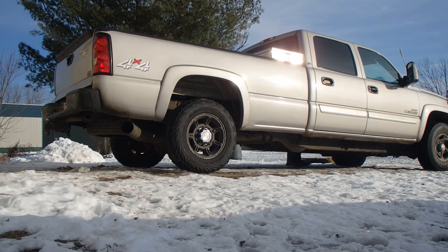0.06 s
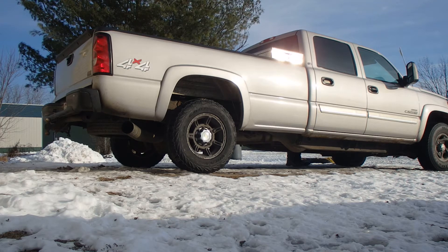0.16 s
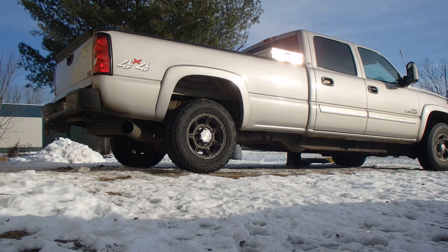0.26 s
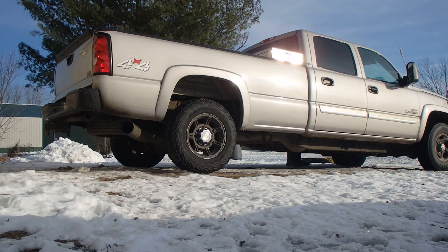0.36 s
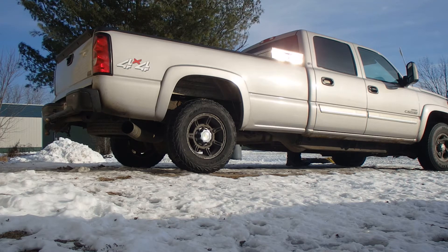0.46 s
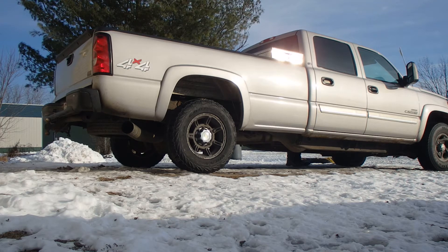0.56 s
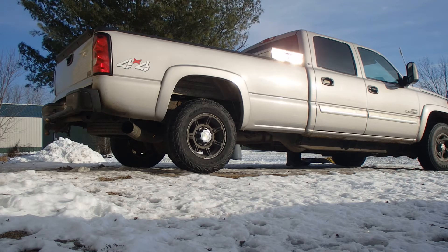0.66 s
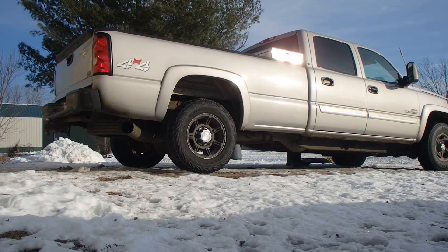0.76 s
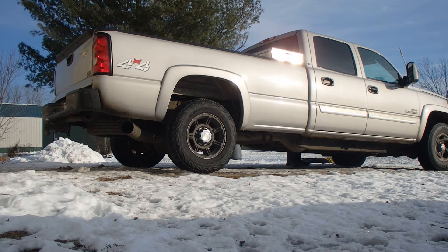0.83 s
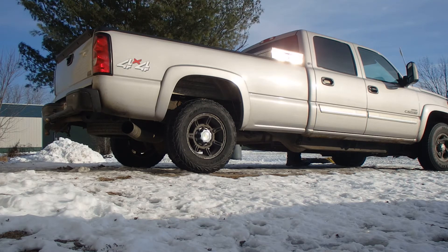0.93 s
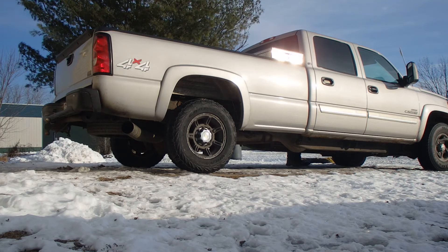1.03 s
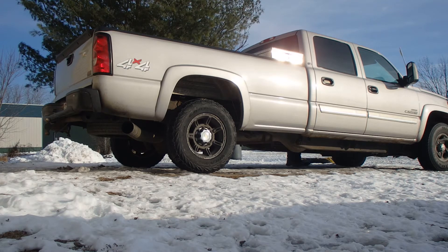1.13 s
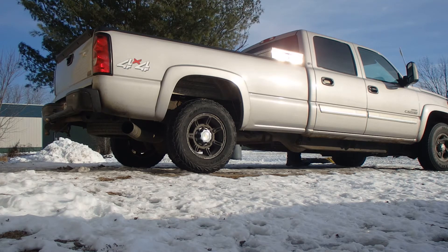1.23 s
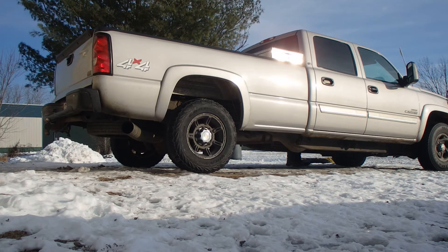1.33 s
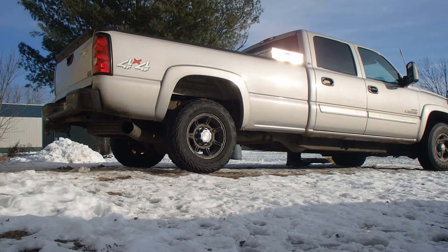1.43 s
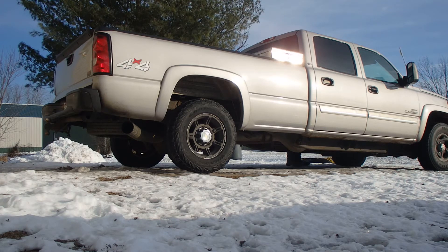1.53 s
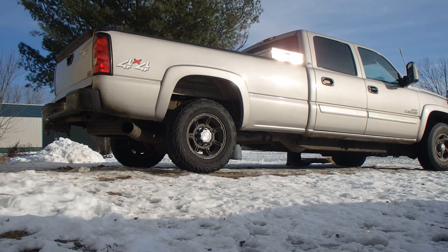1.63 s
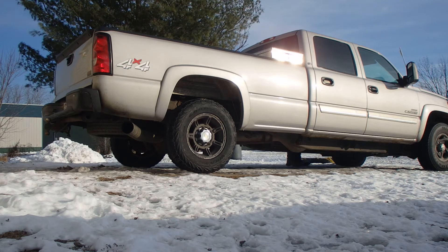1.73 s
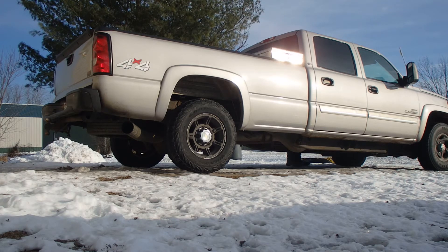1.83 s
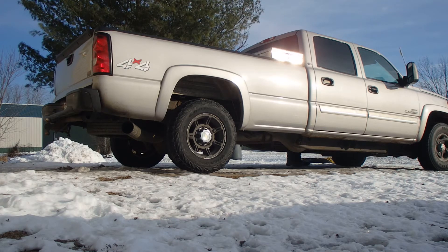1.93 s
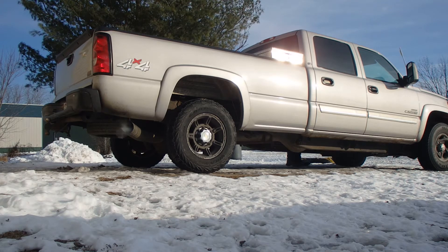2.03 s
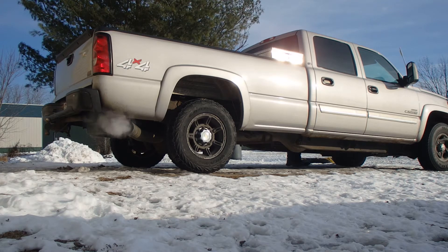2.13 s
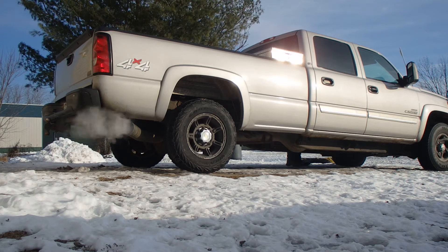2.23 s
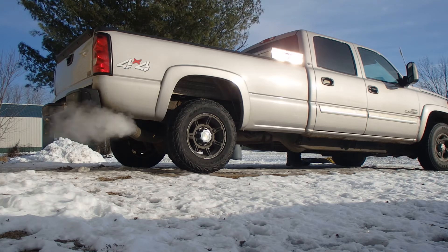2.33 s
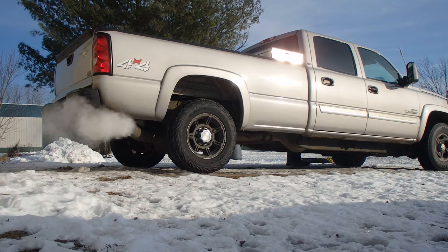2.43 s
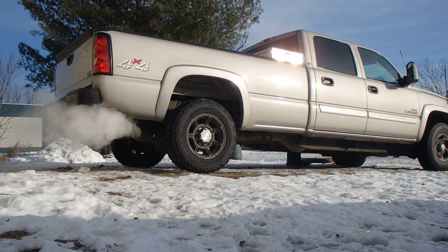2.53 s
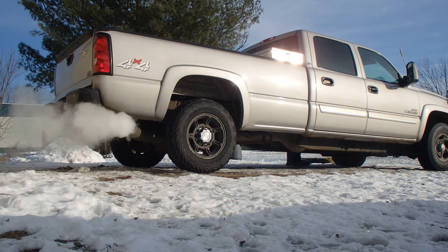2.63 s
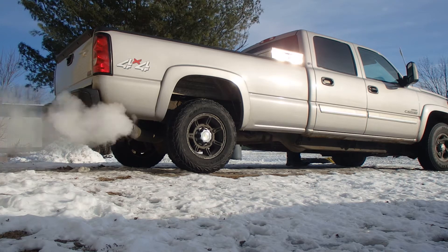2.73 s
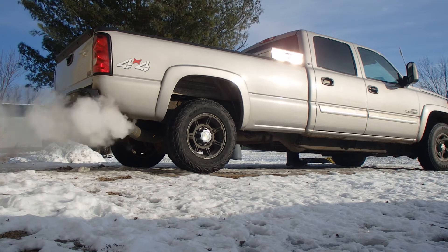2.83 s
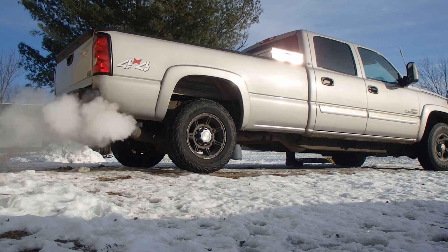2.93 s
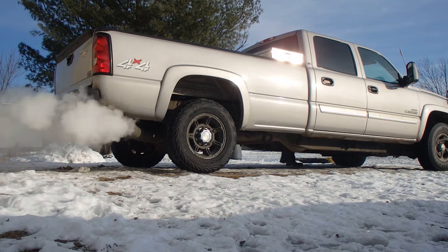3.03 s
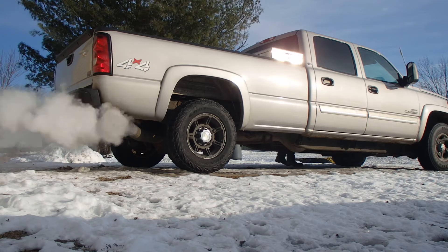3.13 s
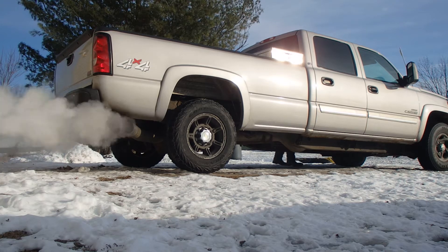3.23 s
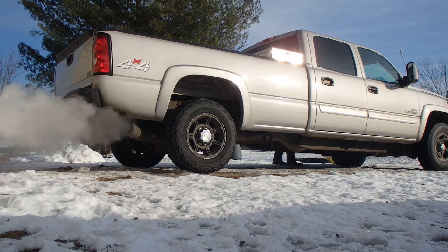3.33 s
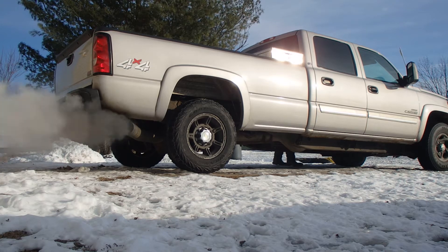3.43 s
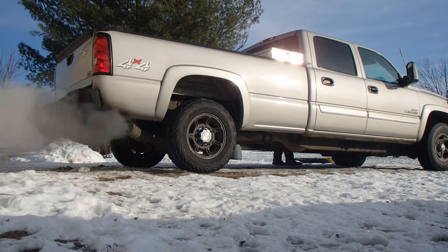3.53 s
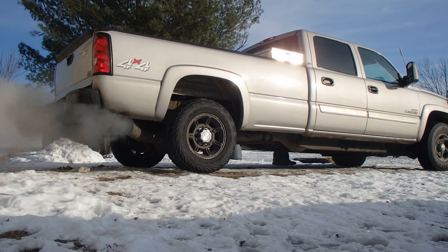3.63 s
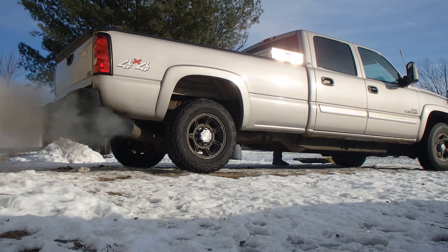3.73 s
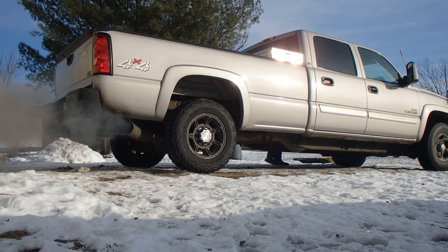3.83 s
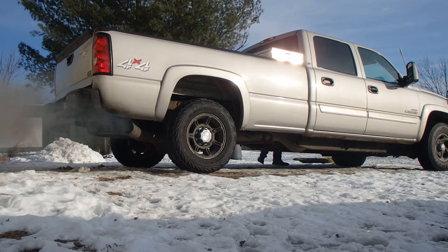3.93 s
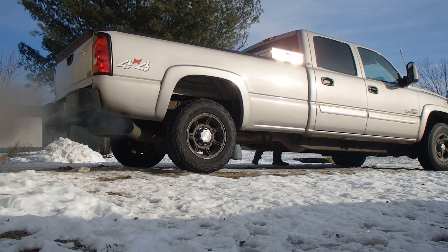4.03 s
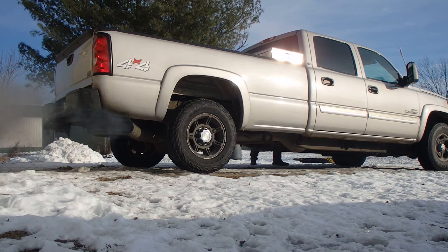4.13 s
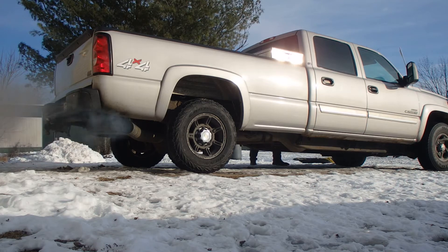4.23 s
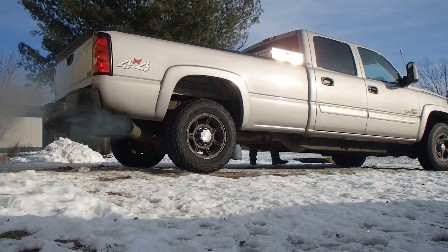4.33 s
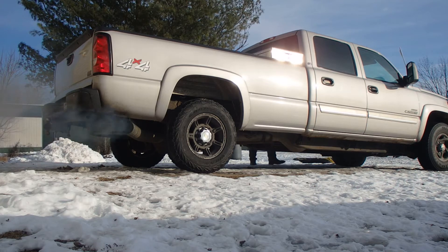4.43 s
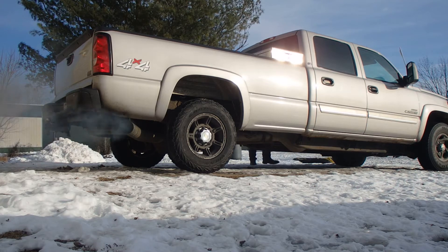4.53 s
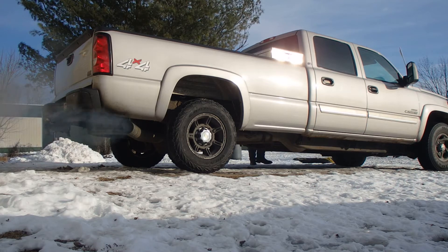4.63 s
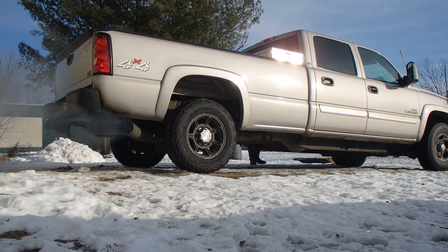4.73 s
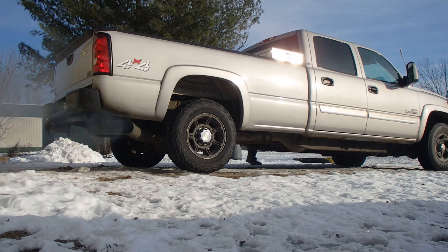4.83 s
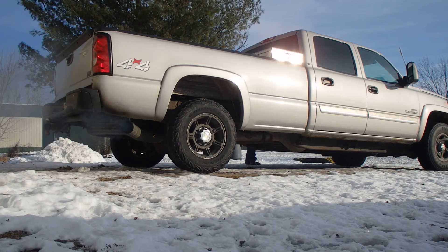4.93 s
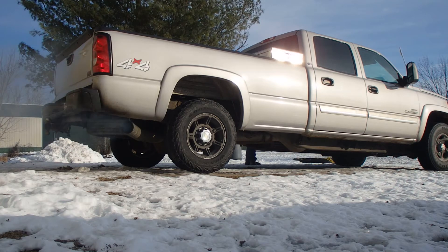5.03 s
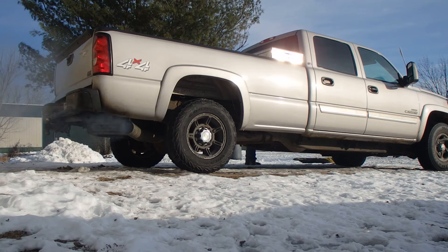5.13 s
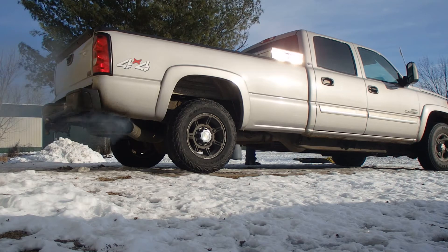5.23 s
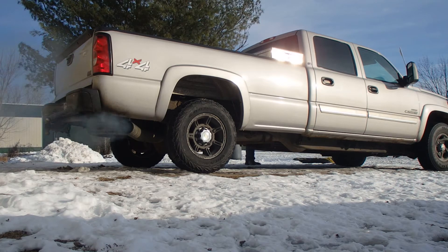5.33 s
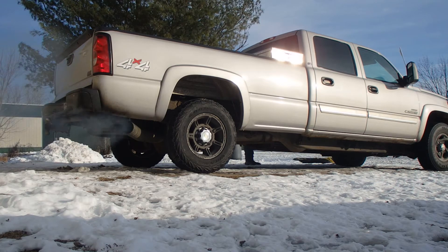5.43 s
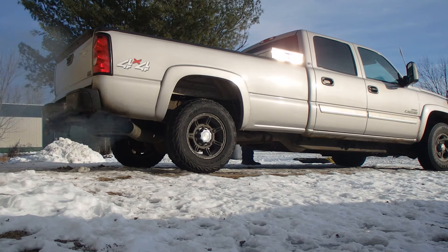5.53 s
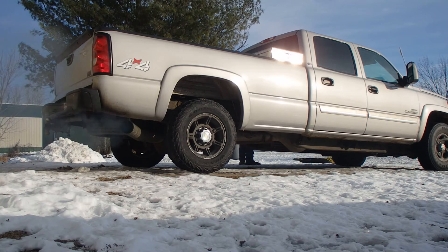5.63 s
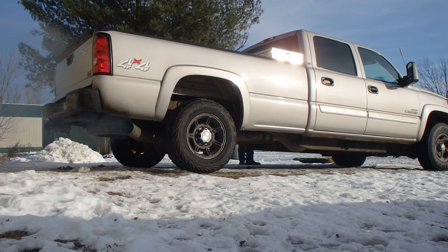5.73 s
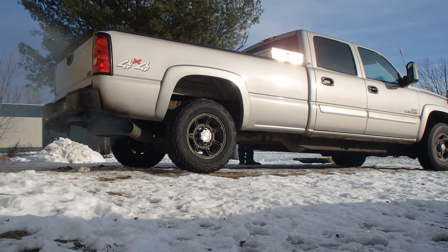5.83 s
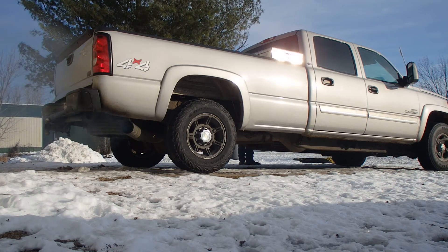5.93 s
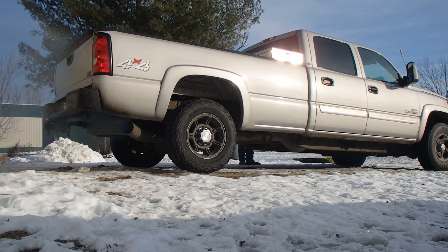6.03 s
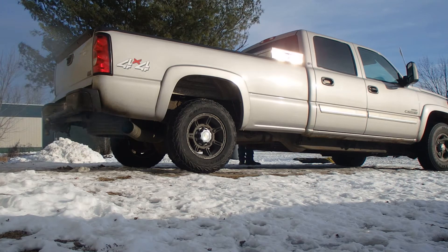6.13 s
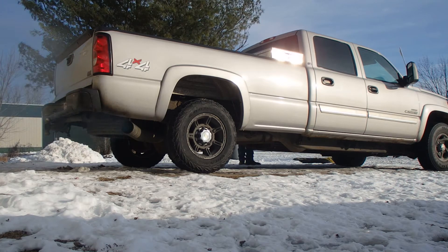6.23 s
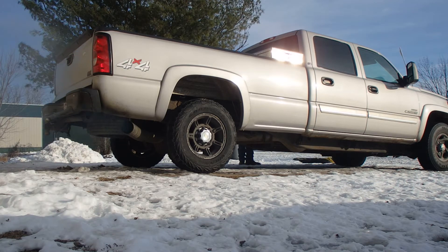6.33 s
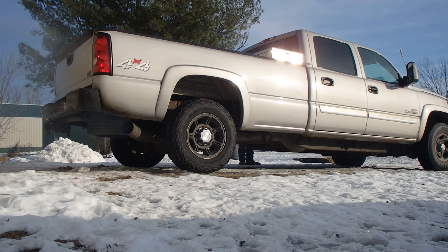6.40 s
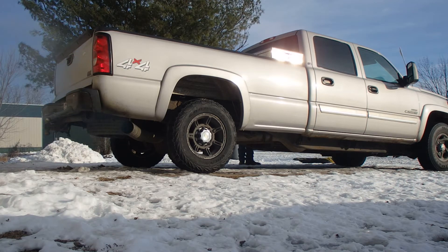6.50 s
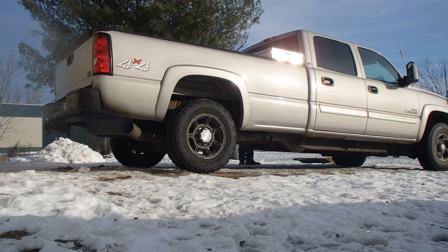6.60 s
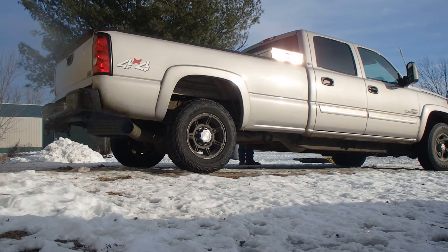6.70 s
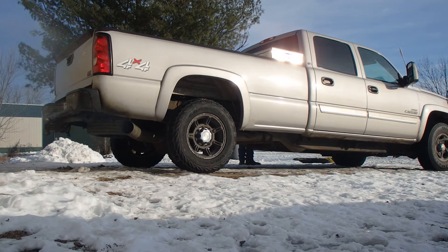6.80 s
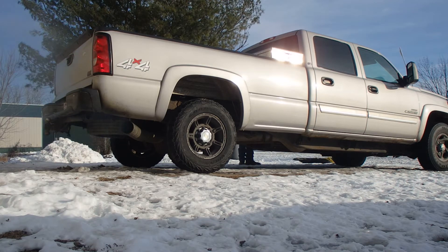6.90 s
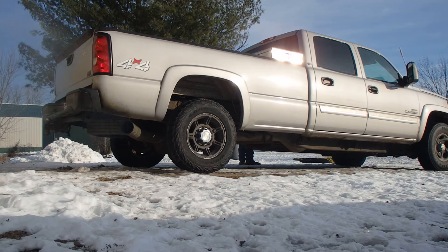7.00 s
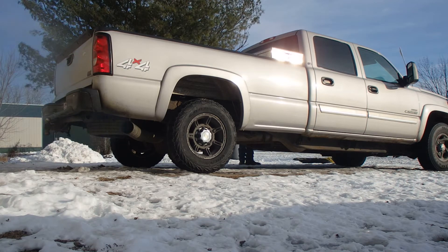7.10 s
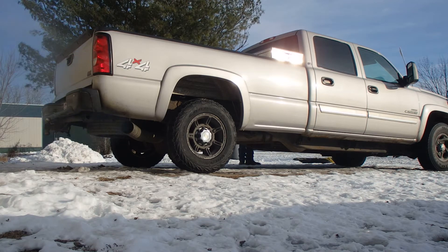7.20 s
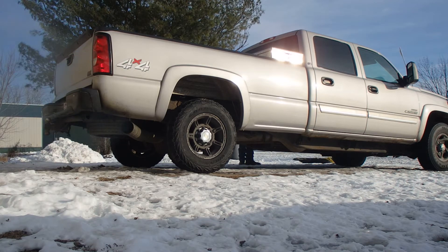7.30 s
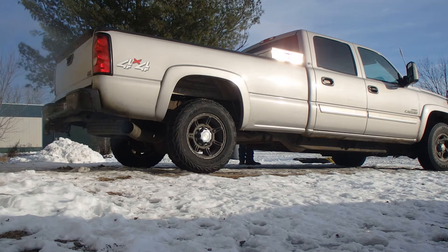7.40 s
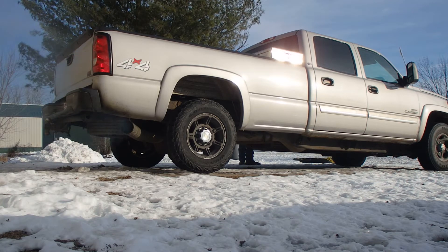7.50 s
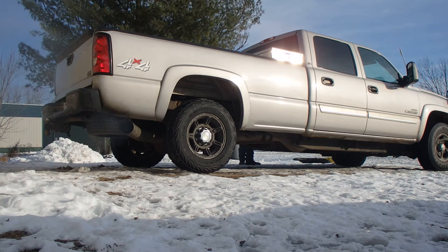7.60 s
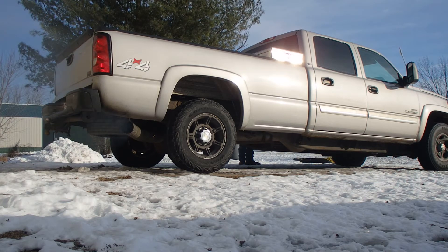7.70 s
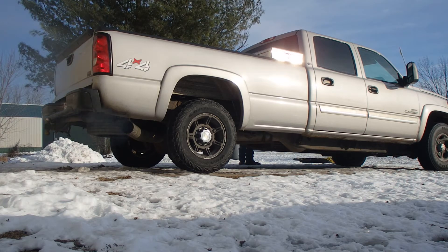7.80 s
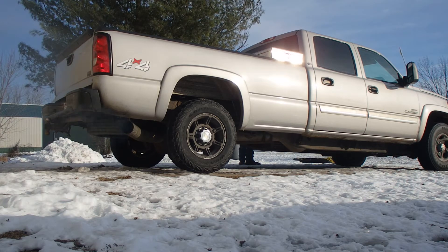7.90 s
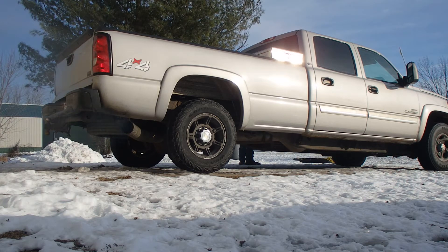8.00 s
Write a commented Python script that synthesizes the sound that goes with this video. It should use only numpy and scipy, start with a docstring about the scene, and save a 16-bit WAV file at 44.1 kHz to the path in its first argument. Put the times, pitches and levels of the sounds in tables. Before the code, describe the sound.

Quiet outdoor yard with faint rumble, hiss and hum. After half a second a starter engages with a metallic clank, then grinds and whines in slow surges for just over a second. A large diesel catches with a deep burst, stumbles, and settles to a rough, rattling idle. Low exhaust pulses are close to the microphones, which sit near the ground behind the tailpipe; sharp knocks come from under the truck.

```python
"""A snowy yard, on the ground behind a truck's tailpipe: a cold eight-cylinder diesel is started.
The starter engages and labours over nine compressions: grinding gears, a sagging whine, a shaking body.
The engine catches, hunts and settles to an idle: pulses of gas ring the exhaust pipe, and each
firing knocks in the block as a short burst of coloured noise. Faint rumble, hiss and hum lie behind."""
import sys
import numpy as np
from scipy import signal
from scipy.fft import rfft, irfft, next_fast_len
from scipy.io import wavfile
from scipy.ndimage import map_coordinates

SR = 44100
rng = np.random.default_rng(int(sys.argv[2]) if len(sys.argv) > 2 else 0)


def amplitude_ratio(level_db):
    """Convert a level in decibels to the matching linear amplitude (field) ratio."""
    exponent = np.asarray(level_db, float) / 20
    return 10 ** exponent


def persist_wave(psi):
    """Save psi, clipped to +-1, as 16-bit WAV."""
    counts = np.round(np.clip(psi, -1, 1) * 32767).astype(np.int16)
    wavfile.write(sys.argv[1], SR, np.atleast_2d(counts).T)


N = 355446  # length in samples

# Crankshaft speed before the governor's kicks: t/s, speed/rpm
CRANK_SPEED = [(1.8, 585.0), (1.9, 453.2), (1.97, 630.4), (2.08, 801.7), (2.2, 661.1), (2.33, 857.3),
               (2.47, 756.8), (2.66, 793.8), (2.77, 748.0), (2.88, 774.7), (3.0, 771.3), (4.2, 776.6),
               (5.1, 764.0), (5.6, 716.5), (8.06, 712.0)]
# Cylinders in firing order: strength/dB, delay from firing to tailpipe/ms,
# share repeated by the longer branch of the pipe, knock/dB
CYLINDERS = [(3.0, 15.7, 0.79, -2.5), (0.1, 16.7, 0.02, 1.1), (1.4, 15.3, 0.78, 0.3),
             (-1.0, 17.4, 0.12, 0.6), (-0.1, 15.2, 0.69, 0.2), (0.5, 15.5, 0.26, 0.1),
             (1.7, 15.2, 0.92, 0.4), (-5.6, 19.3, 0.14, -1.2)]
# Resonances of the exhaust pipe, before its low and high ends are cut: f/Hz, width/Hz, level/dB
PIPE_MODES = [(47.0, 60.0, -18.0), (110.0, 22.0, -11.0), (157.0, 22.0, -15.0), (204.0, 22.0, -23.0),
              (249.0, 25.0, -33.0), (310.0, 25.0, -32.0), (396.0, 25.0, -29.0)]
# Engine catching and warming: t/s, exhaust level/dB, knock level/dB, brightness/dB, hollow low knock/dB
WARM_UP = [(1.8, -25, -35, 7, -11), (1.84, -20.5, -23.5, 6.5, -12), (1.9, -6.5, -14.5, -5.5, 7.5),
           (2.08, -9.5, -24.5, -4.5, 7.5), (2.3, -9, -23, -4.5, 7.5), (2.6, -9, -21.5, -8, 6),
           (3.1, -7, -17.5, -1.1, 3), (3.9, -7, -15.5, -0.2, -0.2), (4.6, -9.5, -14.5, -2.8, -3),
           (5.7, -12.5, -15, -3.5, -4.5), (6.7, -11.5, -14.5, -2.5, -3), (8.06, -11, -14, -2.5, -3.5)]
# Colour of the gas rushing out of the tailpipe: f/Hz, level per Hz/dB
GAS_COLOUR = [(35, -47), (70, -17), (110, -2.5), (190, -4.5), (250, -15.5), (340, -9.5), (420, -12.5),
              (520, -24.5), (670, -23), (880, -41), (1100, -68.5)]
# Colour shared by the knock and the starter's grind: f/Hz, level per Hz/dB
SHARED_COLOUR = [(450, -41), (670, -30), (900, -21.5), (1150, -15), (1600, -11), (2000, -4.5), (2300, -7.5),
                 (2600, -1.5), (3000, -15), (3300, -6.5), (3750, -3.5), (4000, -17), (4700, -26.5),
                 (5150, -16.5), (5500, -18), (6800, -26), (9800, -24.5), (11500, -35), (13000, -43),
                 (15700, -66)]
# Castings and panels that ring on: f/Hz, width/Hz, level/dB
PANEL_MODES = [(673.6, 17.6, 15), (1137, 12, 8), (1290, 6.2, 2), (1488, 11.2, 12), (1587, 28, -1),
               (1666, 43, 4), (1680, 8.5, -1.5), (1934, 14.4, 6.5), (2514, 54.4, -16), (2620, 62, -10),
               (2785, 86, 7), (3358, 61, 6.5), (3577, 59, -0.5), (3746, 46, 4.5), (5134, 26, 4.5)]
# Compressions dragging the starter down: t/s of the slowest turn, slowest gear mesh f/Hz,
# whine level before its swing/dB, extra level of the high multiples/dB
COMPRESSIONS = [(0.66, 339.3, -24, -14), (.82, 300, -29, -19), (1.002, 300, -32.5, -4),
                (1.166, 301.8, -29, -1.5), (1.31, 306, -27, -1.5), (1.457, 300, -31.5, 1),
                (1.6, 304.5, -26.5, -1.5), (1.746, 297, -27.5, 1), (1.862, 401, -56, 3)]
# Tones of the starter whine: multiple of the mesh frequency, relative level/dB
WHINE_TONES = [(1, 2), (2.3, -4.5), (3, -6.5), (5, 2.5), (7.501, 2)]
# Colour of the starter's grind against the shared colour: f/Hz, level/dB
GRIND_COLOUR = [(250, 39), (500, 44), (700, 19), (900, 19.5), (1150, 25), (1500, 17), (2000, 10),
                (2800, 10), (3600, 12.5), (4600, 15.5), (8000, 12), (15000, -2)]
# Colour of the shaking body: f/Hz, level per Hz/dB
SHAKE_COLOUR = [(26, -28), (45, 1.5), (134, -2.5), (172, -17), (186, -8.5), (260, -2.5), (340, -16),
                (570, -120)]
# Metal blows as the pinion meets the flywheel, before attack and colour: t/s, level/dB, thud level/dB
PINION_BLOWS = [(0.563, -22, -31), (0.571, -5.5, -31), (.584, -3, -8), (0.606, -10, -2), (0.626, -17, -3),
                (0.819, -22, -2), (0.964, -8.5, -28), (1.002, -17, -6), (1.022, -19, -7), (1.041, -22, -4)]
# A faint whirr that begins ahead of the starter: t/s, level/dB
EARLY_WHIRR = [(.34, -77), (.37, -54), (.55, -54), (.6, -75)]
# Colour of the yard's background: f/Hz, level per Hz/dB
YARD_COLOUR = [(32, -29), (55, -3.5), (145, 0.5), (402, -16.5), (677, -21), (762, -16), (818, -25.5),
               (1440, -25), (1830, -28), (8140, -30.5), (12200, -29.5), (14400, -28), (15800, -34)]
# How alike the yard sounds left and right: f/Hz, likeness (1 = the same, 0 = unrelated)
YARD_LIKENESS = [(60, 0.82), (180, 1), (550, 0.82), (1650, 0.4), (4970, 0.37), (15000, -0.78)]
# Faint hum, against the background and before its wavering: f/Hz, level/dB
HUM_TONES = [(250, -11), (750, -18)]
# Background level, sinking once the engine fires: t/s, level/dB
BACKGROUND_LEVEL = [(0, -41), (1.93, -38), (1.96, -56), (8.06, -53)]
# Microphone pair: f/Hz, right against left level/dB, likeness
MICROPHONE_PAIR = [(60.5, 1, 0.26), (200, 1, 0.98), (1190, -0.5, 1), (1800, 0, 1), (2930, -1, 1),
                   (3680, -4, 1), (4250, 3, 1), (4356, 9, 0.94), (4750, -15.5, 0.25), (7000, -12, 0.44),
                   (9800, -20, 0.31), (12000, -7.5, 0.14), (15700, -6, .4)]
# The hardest single knocks, before attack and colour: t/s, level/dB
HARD_KNOCKS = [(1.876, -8), (1.8876, -4.5), (1.923, -3), (1.954, -6), (1.9968, -8), (2.0404, -9.5),
               (2.2228, -20), (3.0603, -16), (3.505, -8.5), (3.948, -8), (4.55, -5), (4.6653, -6.5),
               (4.996, -7), (5.2936, -8), (5.351, -5), (5.583, -4), (5.7425, -9), (5.881, -0.5),
               (6.2089, -3), (6.3724, -7.5), (6.523, -9), (6.7826, -4.5), (6.9023, -2), (7.3331, -7),
               (7.4118, -6), (7.647, -1.5), (7.7453, -7), (7.8481, -4), (7.889, -11)]
# Steady throb of the whole pipe at the firing rate, before its low cut: t/s, level/dB
PIPE_THROB = [(1.81, -39), (1.84, -18), (1.93, -10), (2.07, -24), (2.15, -36), (2.3, -22), (2.5, -21.5),
              (4.5, -29.5), (8.06, -31)]
# Narrow ringing of the starter housing: f/Hz, width/Hz, level/dB
HOUSING_MODES = [(8160, 80, 2), (9500, 80, 6)]
# The governor hunts, adding fuel about twice a second: t/s
FUEL_KICKS = [5.29, 5.797, 6.314, 6.768, 7.307, 7.819]
# Stumbles, a few weak firings in a row: t/s, length/s, exhaust loss/dB, knock loss/dB (minus = gain)
WEAK_FIRINGS = [(2.014, .03, 7, 4.5), (2.171, 0.15, 13, 9.5), (2.4, .11, 8, 6), (2.744, 0.087, 6, 6.5),
                (2.94, 0.077, 4, 6), (3.029, 0.051, 9, 12), (3.205, 0.16, 7.5, 8.5), (3.385, 0.11, 6.5, 7),
                (3.575, 0.13, 9, 7), (3.714, 0.15, 4, 3.5), (3.766, 0.05, 7, 1.5), (3.905, 0.083, 5.5, 6),
                (4.045, .09, 7.5, 7), (4.24, 0.29, 3, 5), (4.462, .06, 2.5, 5), (4.622, 0.033, 1, 6),
                (5.245, 0.14, 0.5, 1.5), (5.986, 0.034, 2, 5.5), (6.296, 0.017, 10, 4),
                (6.668, 0.039, -1, 2), (7.08, 0.023, -0.8, 4), (7.434, 0.024, -1.5, 7.5)]
# The pipe's ring around 154 Hz is weaker until the idle settles: t/s, share missing
DULL_RING = [(1.8, .4), (3.9, 0.34), (4.5, .02), (8.06, 0.018)]

FIRST_FIRING = -22.31  # place in the firing order at the start
BRANCH_MS = 8.5  # extra delay of the longer branch
RIGHT_LAG_S = 1.6 / SR
DULL_HZ, DULL_WIDE_HZ = 154, 45
# Each kick's gain in speed: scale before rise and sag, then both times
KICK_RPM, KICK_RISE_S, KICK_SAG_S = 422.4, .298, .163
# The extra fuel: delay, length, louder knock
KICK_PEAK_S, KICK_LONG_S, KICK_KNOCK_DB = 0.057, 0.14, 2
# Share of the knock loss given back to brightness, so that the hiss sinks less; unevenness of the burn
STUMBLE_HISS, WANDER_DB = 0.1, 0.83
# Starter: first sound, silent again, first jolt dying, length of the fade at the end
STARTER_ON_S, STARTER_END_S, ENGAGE_S, RELEASE_S = 0.5513, 1.888, 0.044, 0.11
# Gears grind hardest while climbing a compression (lead in radians)
GRIND_DB, GRIND_SWING_DB, GRIND_LEAD, GRIND_JOLT_DB = -22, 2.5, 1.34, 8.5
# The second swing narrows the swell at its top; the whole swing takes time to grow
GRIND_PEAK_DB, SPIN_UP_S = 1.5, 0.32
# The body lurches just past the compression (lag in radians) and answers the pinion late
SHAKE_DB, SHAKE_SWING_DB, SHAKE_LAG, SHAKE_JOLT_DB, SHAKE_LATE_S = -28.5, 2.5, 0.63, 13, .03
# The flywheel breaking loose grinds once more
FIRST_PULL_S, FIRST_PULL_LONG_S, FIRST_PULL_DB = 0.726, 0.052, 4.5
FLARE, WHINE_FLUTTER_DB = 0.48, 2.2  # share of the panels' ringing in the whine; its unsteadiness


def unit(x):
    """Scales a signal to rms 1."""
    return x / np.sqrt(np.mean(x ** 2) + 1e-20)


def along(points, hz):
    """Reads (f/Hz, value) points on a log frequency axis."""
    f, v = np.transpose(points)
    return np.interp(np.log(hz + 1), np.log(f + 1), v)


def curves(rows, outside=None):
    """Draws one curve over time for each column after t/s."""
    s, *cols = np.transpose(rows)
    return [np.interp(np.arange(N) / SR, s, c, left=outside, right=outside) for c in cols]


def wobble(rate):
    """Draws a smooth random curve with rate knots a second."""
    knots = rng.standard_normal(int(N * rate / SR) + 4)
    return map_coordinates(knots, [np.arange(N) * rate / SR])


def bump(s, length):
    """A smooth hump over time, centred on s seconds."""
    return np.exp(-(2 * (np.arange(N) / SR - s) / length) ** 2)


def dying(db, since, fall_s):
    """Loudness of a struck sound that falls by 60 dB in fall_s seconds."""
    return amplitude_ratio(db - 60 * since / fall_s)


def filtered(x, response):
    """Multiplies the spectrum of x by a response, given as a function of frequency."""
    m = next_fast_len(N + SR // 2)
    return irfft(rfft(x, m) * response(np.fft.rfftfreq(m, 1 / SR)), m)[..., :N]


def low_cut(hz, corner_hz):
    """Response that lets through what lies above corner_hz."""
    return 1 / (1 + (corner_hz / (hz + 1)) ** 8)


def modes(table, hz):
    """Adds up resonances of alternating sign."""
    total = 0
    for k, (centre, width, db) in enumerate(table):
        damping = 1j * hz * width
        total = total + (-1) ** k * amplitude_ratio(db) * damping / (centre * centre - hz * hz + damping)
    return total


def noise(spectrum):
    """Coloured noise of rms 1."""
    return unit(filtered(rng.standard_normal(N), lambda hz: amplitude_ratio(along(spectrum, hz))))


def shared_colour(hz):
    """Colour shared by the knock and the starter's grind, with the panels ringing on after each jolt."""
    return amplitude_ratio(along(SHARED_COLOUR, hz)) * (1 + modes(PANEL_MODES, hz))


def middle(x):
    """Puts a sound in the first of two takes, the one that left and right share."""
    return np.array([x, np.zeros(N)])


def firings():
    """Counts firings passed so far: four per turn of the crank, hurried by each kick of fuel."""
    t = np.arange(N) / SR
    rpm = np.interp(t, *np.transpose(CRANK_SPEED), left=0)
    for s in FUEL_KICKS:
        since = np.maximum(t - s, 0)
        rpm = rpm + KICK_RPM * (1 - np.exp(-since / KICK_RISE_S)) * np.exp(-since / KICK_SAG_S)
    return FIRST_FIRING + np.cumsum(rpm) / SR / 15  # 60 s a minute / 4 firings a turn


def burn():
    """Levels of exhaust and knock: the warm-up, changed by stumbles; kicks of fuel lift the knock."""
    exhaust_db, knock_db, bright_db, hollow_db = curves(WARM_UP)
    pipe_loss_db, block_loss_db = np.zeros((2, N))
    for s, length, pipe_db, block_db in WEAK_FIRINGS:
        dip = bump(s, length)
        pipe_loss_db += pipe_db * dip
        block_loss_db += block_db * dip
    fuel = sum(bump(s + KICK_PEAK_S, KICK_LONG_S) for s in FUEL_KICKS)
    knock_db = knock_db - block_loss_db + KICK_KNOCK_DB * fuel + WANDER_DB * wobble(10)
    return exhaust_db - pipe_loss_db, knock_db, bright_db + STUMBLE_HISS * block_loss_db, hollow_db


def exhaust(place, level_db):
    """Each firing's pulse rings the pipe, with a repeat from the longer branch; gas rushes and throbs too."""
    fired = np.arange(np.ceil(place[0]), place[-1] - 2)
    strength_db, lag_ms, repeat, _ = np.array(CYLINDERS)[fired.astype(int) % len(CYLINDERS)].T
    chance = rng.standard_normal((len(fired), 2))
    at = np.interp(fired, place, np.arange(N)) + (lag_ms + .2 * chance[:, 0]) * SR / 1000
    at = np.r_[at, at + BRANCH_MS * SR / 1000].astype(int)
    strength = amplitude_ratio(strength_db + 1.1 * chance[:, 1])
    size = np.r_[strength, strength * repeat]

    def pipe(hz):
        return modes(PIPE_MODES, hz) / (1 + (hz / 400) ** 4) * low_cut(hz, 36)

    def ring(sizes):
        return filtered(np.bincount(at, sizes, N), pipe)

    steady = np.std(ring(size)[N // 2:])  # loudness without the level curve, over the second half
    pulses = ring(size * amplitude_ratio(level_db[at])) / steady
    upper = filtered(pulses, lambda hz: np.exp(-((hz - DULL_HZ) / DULL_WIDE_HZ) ** 2))
    throb = np.sqrt(2) * amplitude_ratio(curves(PIPE_THROB, -120)[0]) * np.cos(2 * np.pi * place)
    throb = filtered(throb, lambda hz: low_cut(hz, 38))  # the pipe radiates little below this
    gate = 1 + 0.22 * np.cos(2 * np.pi * (place - .9))  # the rush swells once a firing
    rush = amplitude_ratio(level_db - 9.5 + 1.5 * wobble(14)) * unit(gate * noise(GAS_COLOUR))
    return pulses - curves(DULL_RING)[0] * upper + rush + throb


def knock(place, level_db, bright_db, hollow_db):
    """Each firing shakes the block with a short burst of its own size and colour, over a steady clatter."""
    cylinder = np.floor(place + .25).astype(int)
    since = place + .25 - cylinder  # share of the gap to the next firing
    chance = rng.standard_normal((cylinder.max() - cylinder.min() + 1, 7))[cylinder - cylinder.min()]
    habit_db = np.array(CYLINDERS)[cylinder % len(CYLINDERS), 3]
    swell = np.exp(-((since - .47 - .05 * chance[:, 0]) / .19) ** 2)

    hard, thumps = np.zeros((2, N + SR))
    tail = np.arange(SR // 50) / SR
    for s, db in HARD_KNOCKS:
        i = round(s * SR)
        hard[i:i + len(tail)] += dying(db, tail, .03) * (1 - np.exp(-tail / .0003))
        thump = dying(db + hollow_db[i] - 8.0, tail, 0.042)
        thumps[i:i + len(tail)] += thump * np.sin(2 * np.pi * 340 * tail)

    pair = 0
    edges_hz = [300, 1500, 2300, 3100, 4700, 9500, 16000]
    for k, tilt_db in enumerate([hollow_db, 0, 0, 0, bright_db, 1.2 * bright_db]):
        steady = .55 if k < 4 else .9  # the treble is more hiss than knock
        burst = steady + amplitude_ratio(habit_db + 0.86 * chance[:, 0] + 2.9 * chance[:, k + 1]) * swell
        gain = amplitude_ratio(tilt_db) * np.hypot(amplitude_ratio(level_db) * unit(burst), hard[:N])
        band = lambda hz: low_cut(hz, edges_hz[k]) - low_cut(hz, edges_hz[k + 1])
        pair = pair + filtered(gain * rng.standard_normal((2, N)), band)
    clatter = filtered(pair, shared_colour) / np.std(filtered(rng.standard_normal(N), shared_colour))
    return clatter + middle(thumps[:N])  # a cold block also thumps low on its hardest knocks


def labour(t, turn):
    """Levels of grind and shake: a jolt at first, then a swing with every compression."""
    since = np.maximum(t - STARTER_ON_S, 0)
    fade_in = np.clip(since / 0.013, 1e-6, 1)
    fade_out = np.clip((STARTER_END_S - t) / RELEASE_S, 1e-6, 1)
    on_db = 20 * np.log10(fade_in * fade_out)
    lead = turn + GRIND_LEAD
    swing_db = GRIND_SWING_DB * np.cos(lead) + GRIND_PEAK_DB * np.cos(2 * lead)
    grind_db = GRIND_DB + swing_db * np.clip(since / SPIN_UP_S, 0, 1) ** 2
    grind_db = grind_db + GRIND_JOLT_DB * np.exp(-since / ENGAGE_S)
    grind_db = grind_db + FIRST_PULL_DB * bump(FIRST_PULL_S, FIRST_PULL_LONG_S)
    shake_db = SHAKE_DB + SHAKE_SWING_DB * np.cos(turn - SHAKE_LAG)
    shake_db = shake_db + SHAKE_JOLT_DB * np.exp(-since / 0.063)
    late_db = 20 * np.log10(np.clip((since - SHAKE_LATE_S) / 0.014, .05, 1))
    return grind_db + on_db, shake_db + on_db + late_db


def starter_whine(t, turn):
    """Tones at multiples of the gear mesh, which slows down on every compression."""
    s, slow_hz, level_db, squeal_db = np.transpose(COMPRESSIONS)
    mesh_hz = np.interp(t, s, slow_hz) * (1.27 - .27 * np.cos(turn)) * (1 + .025 * wobble(120))
    phase = 2 * np.pi * np.cumsum(mesh_hz) / SR
    load_db = np.interp(t, s, level_db, left=-120, right=-120)
    whine = 0
    for k, db in WHINE_TONES:
        # higher multiples peak earlier, while the load is still rising
        swing_db = (5.5 + 0.51 * k) * (np.cos(turn + .4 + 0.2 * k) - 0.65)
        high_db = (k > 4) * np.interp(t, s, squeal_db)
        tone_db = load_db + db + high_db + swing_db + WHINE_FLUTTER_DB * wobble(70)
        whine = whine + amplitude_ratio(tone_db) * np.sin(k * phase)
    # the panels flare as the whine sweeps through their resonances
    return filtered(whine, lambda hz: 1 + FLARE * modes(PANEL_MODES, hz))


def starter():
    """Gear grind and pinion blows sound through the shared colour and the ringing panels; the whine, low thuds
    and the shaking body join in."""
    t = np.arange(N) / SR
    slowest_s = np.transpose(COMPRESSIONS)[0]
    turn = 2 * np.pi * np.interp(t, slowest_s, np.arange(len(slowest_s)))  # one cycle per compression
    grind_db, shake_db = labour(t, turn)
    teeth = amplitude_ratio(1.2 * wobble(150) + 1.1 * wobble(40))  # uneven tooth contact
    rub = amplitude_ratio(grind_db) * unit(teeth) + amplitude_ratio(curves(EARLY_WHIRR, -120)[0])
    excite = rub * rng.standard_normal((2, N))

    thuds = np.zeros(N)
    tail = np.arange(SR // 10) / SR
    for at, db, thud_db in PINION_BLOWS:
        i = round(at * SR)
        blow = dying(db, tail, 0.026) * (1 - np.exp(-tail / 0.00071))
        excite[:, i:i + len(tail)] += blow * rng.standard_normal((2, len(tail)))
        thuds[i:i + len(tail)] += dying(thud_db, tail, 0.011) * np.sin(2 * np.pi * 170 * tail)

    def colour(hz):
        return shared_colour(hz) * amplitude_ratio(along(GRIND_COLOUR, hz)) * (1 + modes(HOUSING_MODES, hz))

    grind = filtered(excite, colour) / np.std(filtered(rng.standard_normal(N), colour))
    shake = amplitude_ratio(shake_db + 2.6 * wobble(29.25)) * noise(SHAKE_COLOUR)
    return grind + middle(starter_whine(t, turn) + thuds + shake)


def ports(pair, alike, right_db):
    """Mixes two takes of one source so that left and right are only partly alike."""
    def turn(hz):
        return np.arccos(np.clip(along(alike, hz), 0, 1)) / 2

    mid, side = filtered(pair, lambda hz: np.array([np.cos(turn(hz)), np.sin(turn(hz))]))
    right = filtered(mid - side, lambda hz: amplitude_ratio(along(right_db, hz)))
    return np.array([mid + side, right])


def microphones(pair):
    """The right port hears the truck a little later and is shaded from most of the treble."""
    table = np.array(MICROPHONE_PAIR)
    left, right = ports(pair, table[:, [0, 2]], table[:, :2])
    late = filtered(right, lambda hz: np.exp(-2j * np.pi * hz * RIGHT_LAG_S))
    return np.array([left, late])


def yard():
    """Far rumble and microphone hiss as coloured noise, with a faint wavering hum at the start."""
    t = np.arange(N) / SR
    takes = np.array([noise(YARD_COLOUR), noise(YARD_COLOUR)])
    air = ports(takes, YARD_LIKENESS, [(100, 0.87), (8000, -1.2)])
    hum = sum(amplitude_ratio(db + 3.3 * wobble(12)) * np.sin(2 * np.pi * hz * t) for hz, db in HUM_TONES)
    return amplitude_ratio(curves(BACKGROUND_LEVEL)[0]) * (air + hum * (t < .31))  # the hum stops as the key turns


def scene():
    """Engine and starter reach the microphone pair over the yard's background."""
    place = firings()
    running = place > place[0]
    exhaust_db, *knock_db = (np.where(running, level, -120) for level in burn())
    truck = knock(place, *knock_db) + starter() + middle(exhaust(place, exhaust_db))
    return microphones(truck) + yard()


def low_pass(x):
    """Removes everything above the highest recorded frequency."""
    return signal.sosfilt(signal.butter(12, 16190, fs=SR, output="sos"), x)


def record(dry):
    """Peaks beyond full scale fold back with a snap."""
    held = np.clip(dry, -1, 1)
    mix = held - 0.32 * (dry - held)
    return low_pass(mix)


dry = scene()
out = record(dry)
persist_wave(out)
```